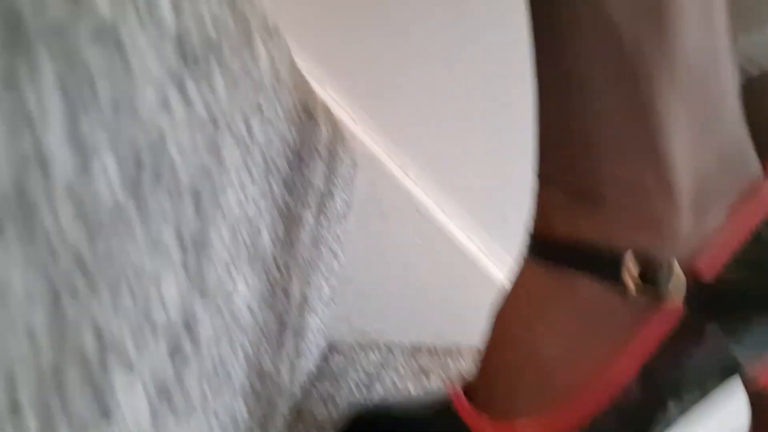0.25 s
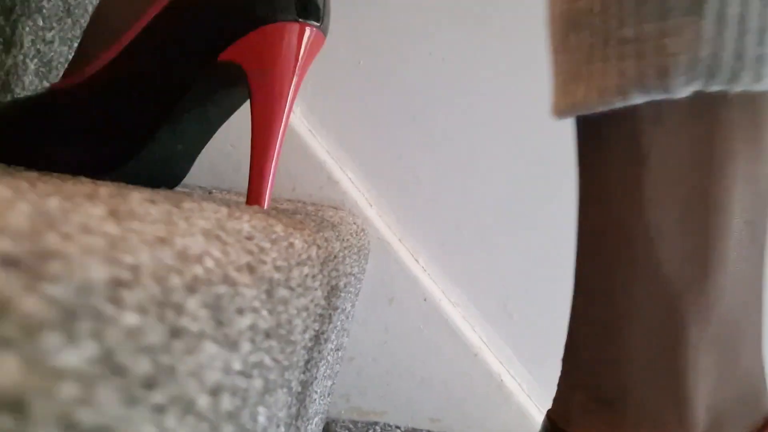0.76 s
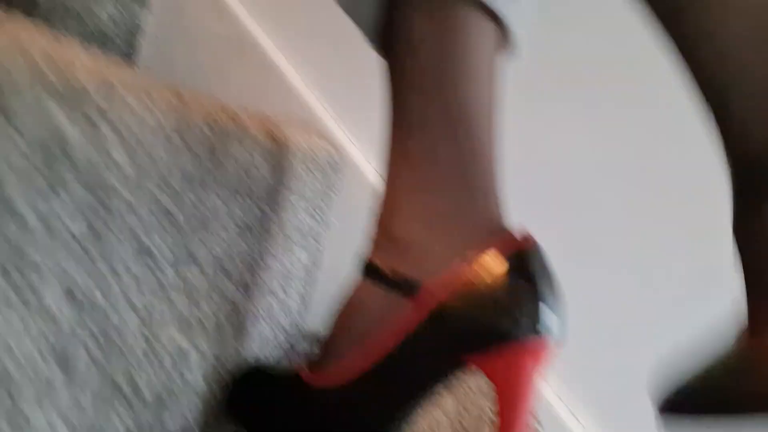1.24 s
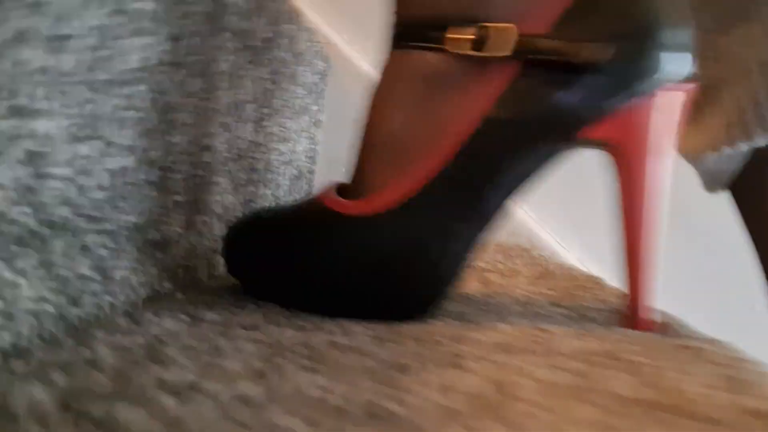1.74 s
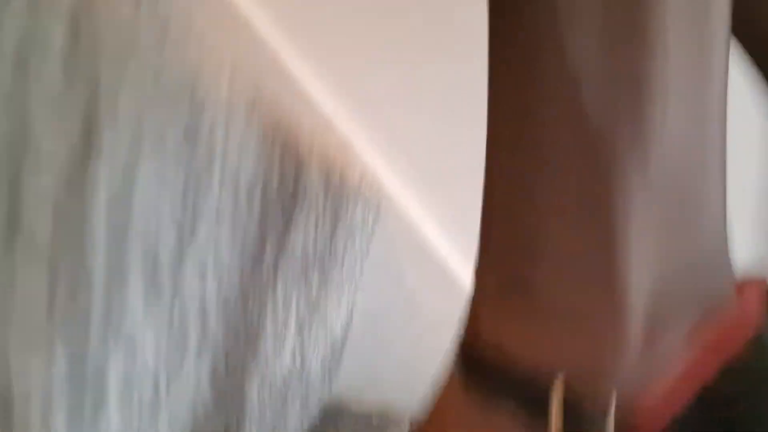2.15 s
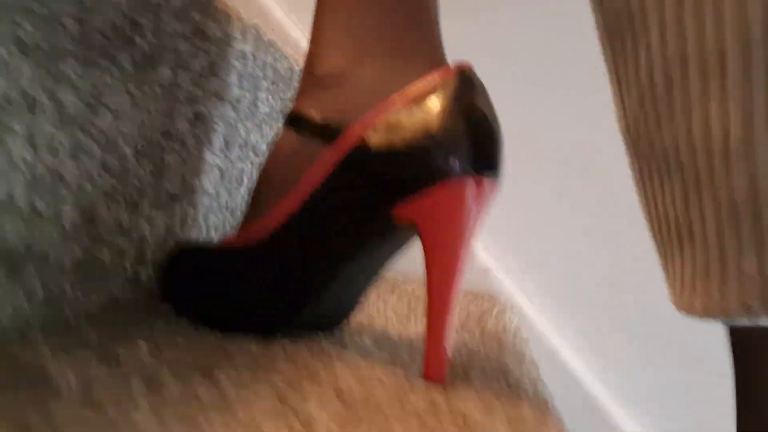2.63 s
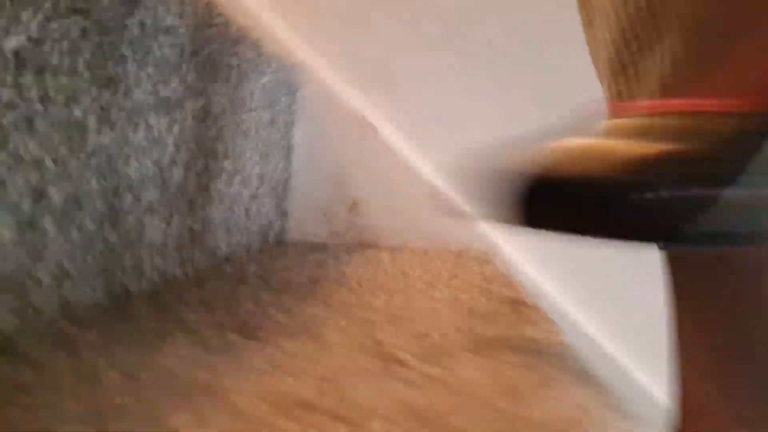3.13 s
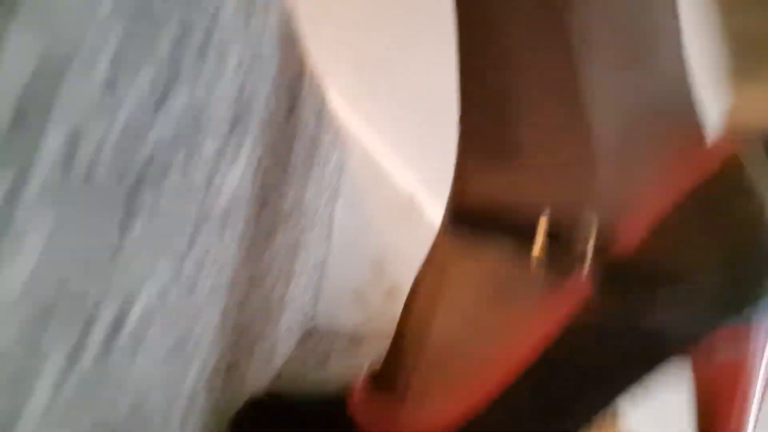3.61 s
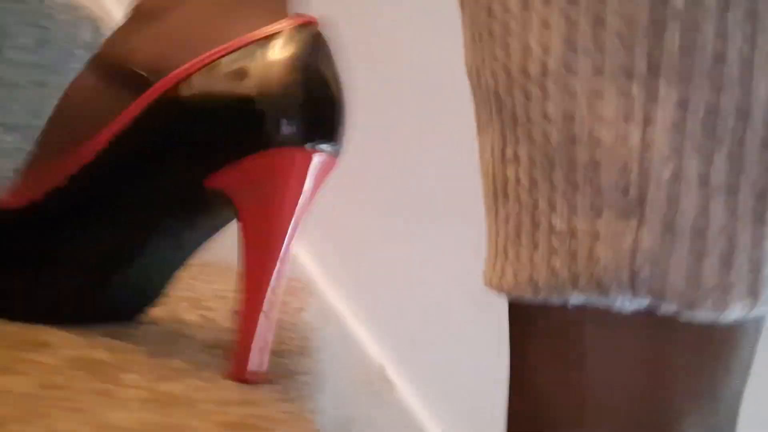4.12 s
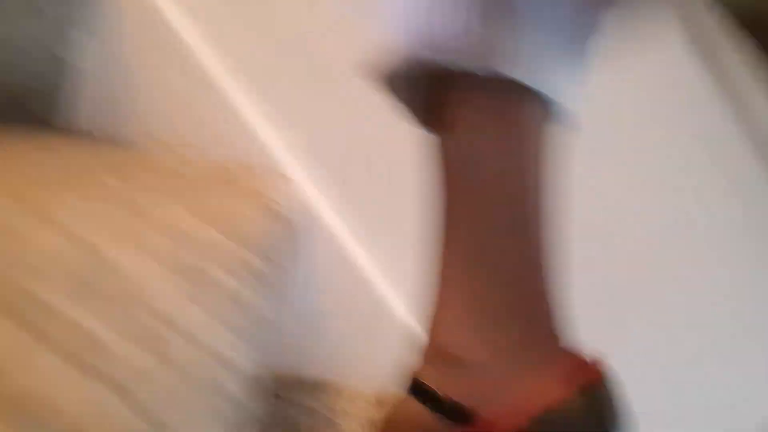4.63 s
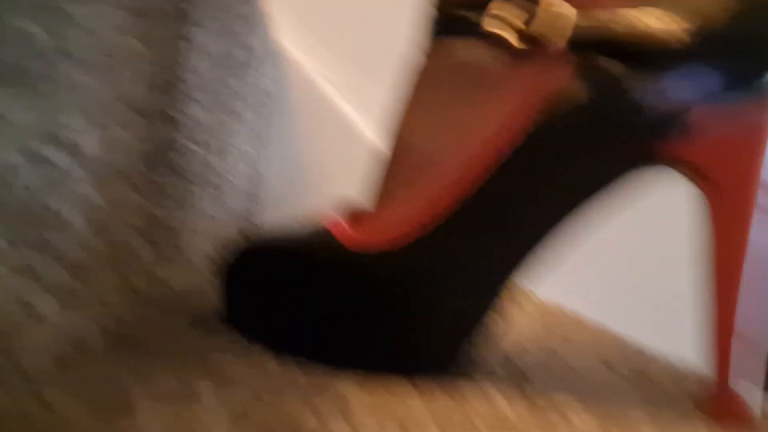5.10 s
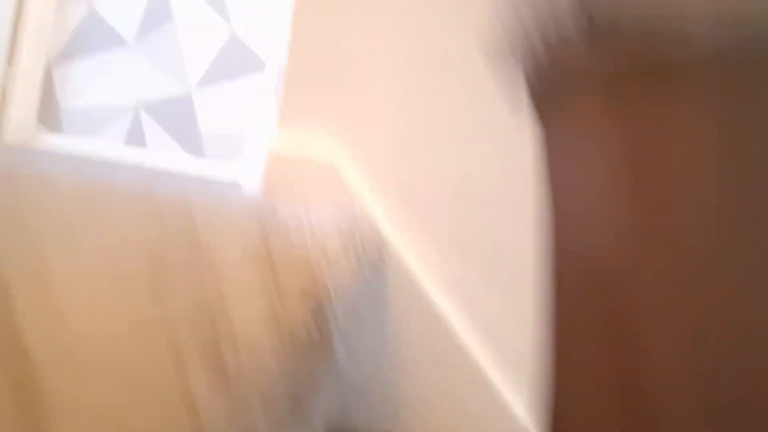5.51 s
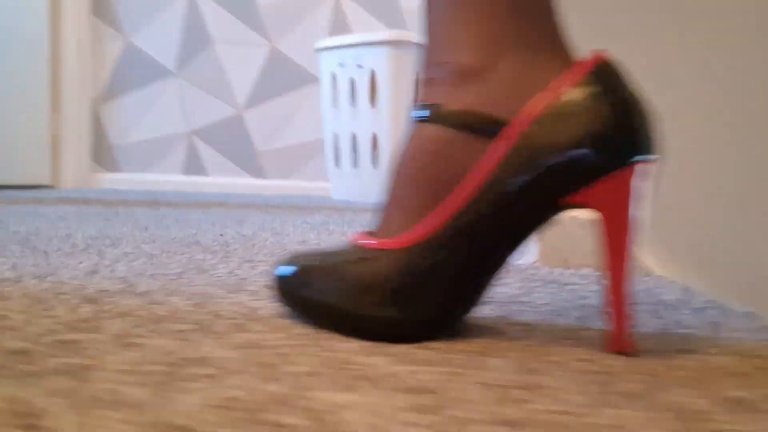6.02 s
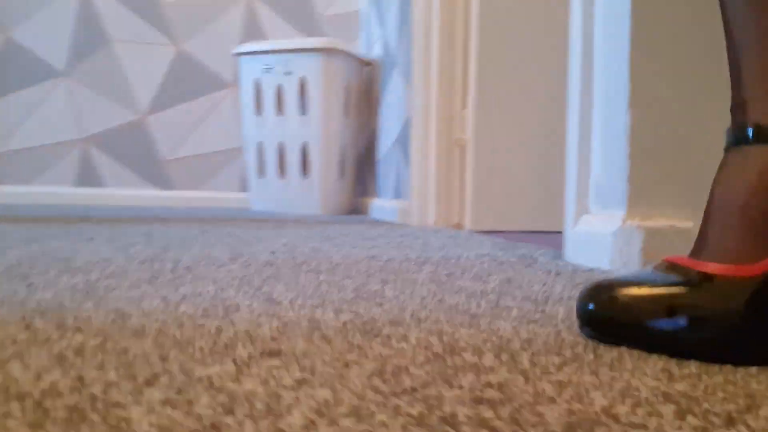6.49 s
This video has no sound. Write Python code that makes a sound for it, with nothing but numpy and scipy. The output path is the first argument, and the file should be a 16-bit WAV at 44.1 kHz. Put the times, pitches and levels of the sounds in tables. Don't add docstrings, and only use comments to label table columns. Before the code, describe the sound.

A person in high heels walks up carpeted wooden stairs, heard very close on a handheld phone in a small, quiet stairwell. A heavy, padded low thud opens at 0 s with a short wooden boom. Another firm thud lands near 0.85 s, then softer steps around 1.7 and 2.6 s; a hard, knocking heel strike sounds at 1.9 s and a duller one at 2.75 s. A strong deep step at 3.45 s brings low heel knocks, followed at 3.6 s by a tiny bright buckle snap. Firm thuds follow at 4.2 s and, loudest of the later ones, 5.1 s, with a dull heel thump at 5.2 s. A soft step with a small gritty scuff comes at 5.95 s, then almost only faint rustle and room air until 7 s. Throughout, pile scuffs, trouser cloth brushes, fibres tick, leather squeaks faintly, boards creak and the staircase rumbles quietly underneath.

```python
import sys
import numpy as np
from scipy import signal
from scipy.fft import rfft, irfft, next_fast_len
from scipy.io import wavfile

SR = 44100
rng = np.random.default_rng(int(sys.argv[2]) if len(sys.argv) > 2 else 0)


def volts(x):
    e = np.asarray(x, float) / 20
    return 10 ** e


def file_out(sig):
    cols = np.atleast_2d(sig).T
    lim = np.clip(cols, -1, 1)
    pcm = np.round(lim * 32767).astype(np.int16)
    wavfile.write(sys.argv[1], SR, pcm)


N = 297851
FOOT_PAN_DB = 3.6


def rms_one(x):
    return x / np.sqrt(np.mean(x ** 2) + 1e-20)


def peak_one(x):
    return x / np.max(np.abs(x))


def decay(t, t60_s):
    return volts(-60 * t / t60_s)


def onset(t, rise_s):
    return 1 - np.exp(-t / rise_s)


def butter(x, order, hz, kind):
    return signal.sosfilt(signal.butter(order, hz, kind, fs=SR, output="sos"), x)


def ring(hz, t60_s, t, phase=0):
    return np.sin(2 * np.pi * hz * t + phase) * decay(t, t60_s)


def resonance(x, hz, width_hz):
    r = np.exp(-np.pi * width_hz / SR)
    zeros = np.array([1, 0, -1]) * (1 - r * r) / 2
    poles = [1, -2 * r * np.cos(2 * np.pi * hz / SR), r * r]
    return signal.lfilter(zeros, poles, x)


def add(out, s, sound, pan_db=0):
    i = round(s * SR)
    sound = np.atleast_2d(sound)[:, :N - i]
    out[:, i:i + sound.shape[1]] += sound * volts(np.array([[pan_db / 2], [-pan_db / 2]]))


# start in seconds, peak in dB, tread pitch in Hz, deep joist in dB,
# stairwell boom in dB.
THUDS = [(0.004, -7, 102.5, -10, -24), (0.16, -27, 97.6, 0.5, -22), (0.846, -31, 77.5, 14.5, -2),
         (0.853, -15, 100.2, -0.5, -17), (1.009, -31.5, 66.9, 3.5, -7.5), (1.321, -45, 70, 9, 4),
         (1.658, -31, 70.3, -27, -4.5), (1.757, -32, 113.8, 7, 2), (1.942, -24, 118, -10, -13),
         (2.63, -42, 112.4, 15, 15), (3.44, -16, 44.2, -3, -9.5), (3.793, -35, 73.3, -14, -3.5),
         (4.189, -20, 100.7, -15, -9), (4.242, -17, 110.2, -1, -11), (4.545, -37.5, 82.8, -5, -23),
         (4.651, -29, 118, -2, -26), (4.726, -29.5, 82.4, 4, -9), (5.092, -18, 129.6, -3, -4.5),
         (5.106, -11.5, 89, -3.5, -14), (5.232, -48, 120, 11, -17), (5.958, -27, 66.4, -5, -19.5)]


def thuds():
    joist_hz, boom_hz, boom_t60_s = 53.4, 118, 0.74
    impact_t60_s, tail_share = 0.17, 0.37
    out, t = np.zeros((2, N)), np.arange(SR // 2) / SR
    for (s, db, hz, joist_db, boom_db), luck in zip(THUDS, rng.random((len(THUDS), 4))):
        t60_s = 0.29 * np.exp(-0.0669 * (db + 17.5))
        tread = ring(hz, t60_s, t) + 0.41 * ring(1.4 * hz, 1.19 * t60_s, t, luck[0])
        joist = volts(joist_db) * ring(joist_hz * (0.851 + 0.603 * luck[1]), 0.94 * t60_s, t, luck[2])
        boom = volts(boom_db) * ring(boom_hz, boom_t60_s, t, luck[3])
        wood = (tread + joist) * (tail_share + decay(t, impact_t60_s))
        add(out, s, volts(db - 8.5) * onset(t, 0.0047) ** 2 * (wood + boom), pan_db=1.66)
    return out


def contact(t):
    swell = (t / .001) * np.exp(1 - t / .001)
    return rng.standard_normal(len(t)) * (swell + 0.14 * decay(t, 0.28))


def crack(force):
    return peak_one(butter(force, 2, [3600, 14500], "band"))


def first_instant(t):
    return np.exp(-t / 0.00038)


# frequency in Hz, level in dB, t60 in seconds.
BOARD = [(207.6, 6.5, 0.34), (240.5, 11.5, 0.2), (300, 12.5, 0.11), (360.7, 2.5, 0.46), (405.6, 7, 0.23),
         (451, -2.5, 0.35), (667, -9.5, 0.4), (833, 2, 0.13)]


def board(t, luck):
    modes = 0
    for k, (hz, db, t60_s) in enumerate(BOARD):
        mode = ring(hz * (1 + 0.0393 * luck[k + 2]), t60_s, t, 0.5 * luck[k + 1])
        modes = modes + volts(db + 5.1 * luck[k]) * mode
    return peak_one(modes * onset(t, 0.0035) * (0.17 + decay(t, 0.033)))


def rise(hz, t):
    return onset(t, .0004 + .3 / hz) ** 2


# start in seconds, peak in dB, crack in dB, board in dB,
# time until seated in seconds.
STRIKES = [
    (0.211, -39.5, -47, -7.5, 0.00053),
    (0.435, -39, -55, -11, 0.00027),
    (1.928, -22.5, -39, -7, 0.003),
    (2.7408, -35, -62, -4, 0.00027),
    (3.47, -27, -55, -14, 0.0018),
    (4.637, -39, -41, 4.5, 0.00049),
    (5.229, -21, -44, -12, 0.00063),
]
# frequency in Hz, width in Hz, level in dB.
STRIKE_RINGS = [
    [(728, 170, -2.5), (1850, 87, -6)],
    [(480, 36, -7), (1080, 80, 0.5), (1623, 90, -3), (2360, 140, -11)],
    [(1022, 41, -3.5), (1502, 210, -4), (512, 140, 5), (690, 150, -6), (2230, 300, -30), (3150, 240, -15),
     (3500, 250, -24), (5200, 590, -29.5), (7550, 460, -36.5)],
    [(385, 160, 2.5), (697, 290, 0), (950, 250, -0.5), (1500, 83, -8.5), (1720, 59, -7)],
    [(350, 210, 7), (897, 69, -5.5), (1810, 270, -20), (2450, 110, -17.5), (3200, 440, -16),
     (3490, 730, -22), (5850, 220, -31), (10000, 390, -67)],
    [(480, 33, 6.5), (960, 84, -16), (1540, 87, -15), (2700, 240, -40)],
    [(297, 240, 9.5), (538, 170, 4.5), (1100, 220, -12), (1710, 72, -19), (2313, 330, -13),
     (3280, 270, -16.5), (4180, 130, -16), (5900, 280, -39), (7460, 430, -44)],
]


def strikes():
    seat_split_hz = 700
    lead_s, lead_db = 0.012, -19.5
    wash_db = -30
    out, t = np.zeros((2, N)), np.arange(SR // 4) / SR
    lucks = rng.standard_normal((len(STRIKES), 12))
    for (s, db, crack_db, board_db, seat_s), rings, luck in zip(STRIKES, STRIKE_RINGS, lucks):
        force, grit = contact(t), rng.standard_normal(len(t))
        seated = np.maximum(t - seat_s, 0)
        crush = grit * (t / lead_s) ** 2 * (t < lead_s)
        clean, rough, crushed = 0, 0, 0
        for hz, width_hz, ring_db in rings:
            late = seated if hz < seat_split_hz else t
            damped = volts(ring_db - 23.0 * width_hz * seated) * width_hz
            clean = clean - damped * ring(hz, np.inf, late) * rise(hz, late)
            gain = volts(ring_db) * np.sqrt(width_hz)
            rough = rough + gain * resonance(force, hz, 0.5 * width_hz)
            crushed = crushed + gain * resonance(crush, hz, 2 * width_hz)
        rough = rough * decay(t, 0.054)
        layers = 1.16 * peak_one(clean) + .5 * peak_one(rough)
        layers = layers + volts(board_db) * board(seated, luck)
        layers = layers + volts(crack_db) * crack(force * first_instant(t))
        wash = rms_one(resonance(grit, 500, 820)) * onset(t, 0.012) * decay(t, 0.25)
        add(out, s - .0005, volts(db) * layers, FOOT_PAN_DB + 1.1 * luck[11])
        add(out, s, volts(db + wash_db) * wash, FOOT_PAN_DB)
        add(out, s - lead_s, volts(db + lead_db) * peak_one(crushed), FOOT_PAN_DB)
    return out


# start in seconds, peak in dB, ring in Hz, board in dB.
KNOCKS = [(0.077, -49.5, 753, -4.5), (1.039, -54, 1530, -6.5), (1.773, -53.5, 1080, 3.5),
          (1.872, -45, 1390, -3.5), (1.884, -44, 1500, -22), (1.947, -40.5, 1730, 1.5),
          (2.294, -57, 1300, -33), (2.7955, -48.5, 1100, -5), (2.861, -59, 830, -7),
          (3.11, -61.5, 690, -10.5), (3.435, -58, 815, 10.5), (3.487, -31.5, 636, -9.5),
          (3.557, -46.5, 860, -5), (5.247, -54, 686, 9), (5.964, -41, 814, -13.5), (6.152, -65, 646, 5),
          (6.692, -57.5, 2080, -18)]
# start in seconds, peak in dB, ring in Hz, board in dB, shell in dB.
CLACKS = [
    (2.646, -61, 624, 11.5, -16),
    (3.497, -42, 1004, -10, -19),
    (3.601, -46, 410, -6, -40),
    (4.382, -48, 928, -19, -17),
    (5.091, -60, 890, 7, -20),
    (5.116, -45.5, 920, 7, -15),
]
# frequency in Hz, width in Hz, level in dB.
SHELL = [(1985, 180, 18.5), (2100, 730, 14.5), (3150, 1600, 5), (3950, 1500, -23)]


def knocks():
    tap_shell_db, tap_shell_follows = -16.5, 0.78
    out, t = np.zeros((2, N)), np.arange(SR // 4) / SR
    taps = [(*row, tap_shell_db - (1 - tap_shell_follows) * (row[1] + 50)) for row in KNOCKS]
    hits = sorted(taps + CLACKS)
    for (s, db, hz, board_db, shell_db), luck in zip(hits, rng.standard_normal((len(hits), 12))):
        crack_db = shell_db - 18
        force = contact(t)
        tip = 0.8 * ring(hz, 10.7 / hz + 0.015, t) * onset(t, 0.0012)
        tip = tip + 0.26 * peak_one(resonance(force, 1.345 * hz, 0.13 * hz))
        shell = 0
        for k, (shell_hz, width_hz, mode_db) in enumerate(SHELL):
            gain = volts(mode_db + 6.0 * luck[k + 4]) * (-1) ** k
            shell = shell + gain * resonance(force, shell_hz, width_hz)
        layers = volts(1.5) * tip + volts(board_db + 6.5) * board(t, luck)
        layers = layers + volts(shell_db + 7.5) * peak_one(shell) + volts(crack_db - 9.0) * crack(force)
        add(out, s - .0008, volts(db) * layers, FOOT_PAN_DB + 13.6 * luck[11])
    return out


# start in seconds, peak in
# dB, centre in Hz, width in Hz, # length in seconds.
GRINDS = [(0.43, -54, 1380, 1100, 0.04), (1.722, -92, 1580, 1150, 0.022), (4.179, -57.5, 370, 300, 0.018),
          (2.703, -65, 1100, 890, 0.13), (3.419, -58.5, 820, 350, 0.038), (3.603, -55, 840, 500, 0.019),
          (3.86, -67.5, 1020, 875, 0.13), (4.233, -66, 820, 583, 0.068), (4.653, -62, 1460, 1750, 0.029),
          (5.931, -42.5, 915, 259, 0.017)]


def grinds():
    out, t = np.zeros((2, N)), np.arange(SR // 5) / SR
    grains_per_s = 3000
    for s, db, hz, width_hz, length_s in GRINDS:
        size = volts(5.4 * np.minimum(rng.exponential(1, len(t)), 4))
        grains = rng.standard_normal(len(t)) * size * (rng.random(len(t)) < grains_per_s / SR)
        for width in (width_hz, 2 * width_hz, 2 * width_hz):
            grains = resonance(grains, hz, width)
        drag = onset(t, .003) ** 2 * volts(-6.0 * t / length_s) / (1 + (t / length_s) ** 5)
        add(out, s - .002, volts(db) * rms_one(grains) * drag, FOOT_PAN_DB)
    return out


# start in seconds, peak in dB.
SNAP = [
    (3.6084, -19.5),
]
# frequency in Hz, level in dB, t60 in seconds, pan in dB.
BUCKLE = [(5680, 16, 0.01, -5), (10000, 3, 0.0039, 4), (13200, 8, 0.005, -3), (13500, 10.5, 0.018, 10),
          (15700, 20.5, 0.0032, -5)]


def buckle():
    out, t = np.zeros((2, N)), np.arange(SR // 10) / SR
    (s, db), = SNAP
    for lag_s, lag_db in [(.001, 0), (.0023, -5), (.005, -16)]:
        for hz, mode_db, t60_s, pan_db in BUCKLE:
            mode = ring(hz * rng.uniform(.98, 1.02), t60_s, t)
            add(out, s + lag_s, volts(db + lag_db + mode_db - 24) * mode, pan_db)
        snap = crack(contact(t) * first_instant(t))
        add(out, s + lag_s, volts(db + lag_db - 16.0) * snap, pan_db=14.0)
    return out


def drift(rate_hz):
    r = np.exp(-80 * np.pi * rate_hz / SR)
    slow = signal.lfilter([1], [1, -2 * r, r * r], rng.standard_normal(N // 40 + 2002))[2000:]
    return np.interp(np.arange(N) / 40, np.arange(len(slow)), rms_one(slow))


def at_hz(points, hz, **ends):
    point_hz, value = np.transpose(points)
    return np.interp(np.log(hz), np.log(point_hz), value, **ends)


# frequency in Hz, left-right likeness from -1 to 1.
LIKENESS = [(60, 0.87), (180, 1), (550, 0.26), (1650, -0.56), (4970, -1.2), (15000, -0.02)]


def banded_noise(spectrum, patchy_db, flicker_hz):
    out, together = 0, drift(flicker_hz / 3)
    low_hz, top_hz = spectrum[0][0], min(spectrum[-1][0], 17000)
    edges = np.geomspace(low_hz, top_hz, int(2.5 * np.log2(top_hz / low_hz)) + 2)
    white = rng.standard_normal((2, 2, N + 8000))
    for k, (low, high) in enumerate(zip(edges, edges[1:])):
        mid, side = butter(white[k % 2], 2, [low, high], "band")[:, 8000:]
        hz = np.sqrt(low * high)
        alike = np.clip(at_hz(LIKENESS, hz), 0, .995)
        flicker_db = patchy_db * (together + 2.2 * drift(flicker_hz))
        gain = volts(at_hz(spectrum, hz, left=-90, right=-90) + flicker_db)
        out = out + gain * (np.sqrt(1 + alike) * mid + np.sqrt(1 - alike) * side * [[1], [-1]])
    return rms_one(out)


# start in seconds, peak in dB, duller part in dB,
# t60 in seconds.
LANDINGS = [
    (0.8364, -58.5, 6, 0.19),
    (1.731, -56.5, 6.5, 0.16),
    (2.6255, -56, 4, 0.18),
    (3.417, -59, 2, 0.4),
    (4.249, -53, 1, 0.088),
    (5.0937, -46.5, 0, 0.067),
    (5.93, -51, -2, 0.16),
]
# start in seconds, peak in dB, duller part in dB, t60 in seconds.
BRUSHES = [(0.117, -56, -25, 0.3), (0.202, -60.5, 4.5, 0.19), (0.306, -52.5, -12, 0.27),
           (0.5064, -58.5, -3.5, 0.078), (0.661, -56, -31, 0.63), (1.004, -54, -7, 0.093),
           (1.036, -61.5, -2, 0.3), (1.2834, -61, 1, 0.19), (2.2016, -64.5, 3.5, 0.25),
           (2.298, -63, -2, 0.16), (3.0624, -72.5, 3.5, 0.52), (3.376, -56.5, -8, 0.1),
           (3.494, -53, 12, 0.025), (3.525, -51.5, -22, 0.26), (3.608, -52, 4.5, 0.14),
           (4.38, -60, 3, 0.17), (4.575, -57, 3, 0.052), (4.632, -63, 11, 0.33), (4.748, -53.5, -30, 0.086),
           (5.11, -62, 19.5, 0.15), (5.19, -55.5, 14, 0.0092), (6.159, -76, 13.5, 0.23)]
# frequency in Hz, level in dB per Hz.
PILE = [(2060, -21), (3500, -1), (3920, -16), (4290, 0), (4780, -2.5), (8690, -5), (10500, -11.5),
        (16000, -8.5)]
# frequency in Hz, level in dB per Hz.
SWISH = [(350, -49.5), (600, 7), (753, -8), (848, -2), (1250, -5), (2650, -10.5), (4500, -18.5),
         (5850, -25.5), (9900, -120)]


def scuffs():
    out, t = np.zeros((2, N)), np.arange(SR // 3) / SR
    grain = volts(0.56 * drift(200))
    bright = banded_noise(PILE, 0.63, 64) * grain
    dull = banded_noise(SWISH, 1.2, 19.0) * grain
    for table, pan_db, swell_s in [(LANDINGS, 2.5, 0.0061), (BRUSHES, -4, 0.0028)]:
        for s, db, dull_db, t60_s in table:
            i = round(s * SR)
            fibres = bright[:, i:i + len(t)] + volts(dull_db + 7.5) * dull[:, i:i + len(t)]
            add(out, s, volts(db - 8.0) * fibres * onset(t, swell_s) * decay(t, t60_s), pan_db)
    return out


# start in seconds, rms in dB, pitch in Hz, width in Hz, length in seconds.
SQUEAKS = [(0.19, -61.5, 480, 120, 0.042), (0.593, -73.5, 383, 90, 0.096), (0.821, -70.5, 480, 121, .05),
           (1.561, -79.5, 2970, 400, .09), (1.686, -57.5, 205, 60, 0.082), (2.62, -57.5, 300, 79.5, .08),
           (3.8, -57, 196, 40.3, .12), (4.041, -83, 3150, 170, .04), (4.043, -85, 5750, 88.3, .035),
           (4.152, -87, 5200, 200, .015), (4.168, -73.5, 3500, 260, 0.027), (4.859, -69.5, 277, 71, 0.15),
           (5.09, -64, 2330, 350, 0.013), (5.099, -65, 4180, 147, 0.013), (5.12, -73, 5200, 121, .022),
           (5.466, -66, 480, 194, 0.024), (5.931, -56.5, 690, 80, .03), (6.467, -68, 350, 60, 0.087)]


def squeaks():
    out, t = np.zeros((2, N)), np.arange(SR // 4) / SR
    for s, db, hz, width_hz, length_s in SQUEAKS:
        rub = rng.standard_normal(len(t))
        arch = np.sin(np.pi * np.clip(t / (1.57 * length_s), 0, 1)) ** 0.77
        tone = rms_one(resonance(resonance(rub, hz, width_hz), hz, width_hz))
        add(out, s - 0.18 * length_s, volts(db) * arch * tone, pan_db=5.5)
    return out


def tiny_contacts(table, width_share):
    out, t = np.zeros((2, N)), np.arange(SR // 40) / SR
    for s, db, hz, pan_db in table:
        add(out, s - .001, volts(db) * peak_one(resonance(contact(t), hz, width_share * hz)), pan_db)
    return out


# start in seconds, peak in dB, centre in Hz, pan in dB.
TICKS = [(0.053, -62, 2500, 0), (0.504, -64, 6800, -5), (0.595, -61, 7000, -9), (0.878, -64, 7000, 17),
         (1.038, -66, 1500, 0), (1.09, -64, 6000, -10), (1.367, -68, 7000, -8), (1.544, -66.5, 6000, -12),
         (1.865, -70, 7500, -8), (2.124, -66.5, 4800, -8), (2.299, -71, 12000, 5), (2.633, -62, 9000, 6),
         (2.702, -68, 1500, -5), (2.718, -66, 8500, -1), (2.727, -74, 8000, -5), (2.812, -69, 13000, 0),
         (2.824, -70, 13900, -8), (2.862, -80, 10900, 4), (2.958, -75, 8000, -7), (3.09, -71, 5300, 1.5),
         (3.119, -70, 10400, 2), (3.45, -61, 11000, 3), (3.456, -63, 10000, 0), (3.498, -65, 12000, -1),
         (3.504, -64, 11000, -1), (3.53, -51.5, 8440, -12), (3.536, -51, 8950, -6), (3.611, -39, 5500, -8),
         (3.628, -69, 13500, 0), (3.908, -67, 4300, 0), (4.263, -49, 1000, 2), (4.376, -70, 11500, 2),
         (4.381, -55.5, 4370, -6), (4.388, -69, 10000, 6), (4.405, -64, 6500, 0), (4.413, -65, 10600, 8),
         (4.425, -68, 11000, 3), (4.648, -64, 1980, 0), (4.657, -49, 1210, -2), (4.669, -60, 2500, 2),
         (5.093, -59, 5000, 8), (5.103, -57, 13000, 7), (5.113, -46.5, 12300, 12), (5.128, -57, 13000, 4),
         (5.116, -56, 2980, 4), (5.126, -46.5, 1850, 0), (5.191, -60, 3000, 18)]


def ticks():
    return tiny_contacts(TICKS, width_share=0.23)


# start in seconds, peak in dB, centre in Hz, pan in dB.
PRICKS = [(1.9385, -51, 7000, -3), (1.757, -61, 5500, 0), (1.777, -62, 3030, 0), (1.894, -63, 3600, 0),
          (2.058, -63, 2500, 0), (2.633, -62, 3500, 3), (2.797, -68, 6000, -5), (4.654, -48, 900, 2),
          (3.498, -60, 5000, 0), (4.389, -70, 6000, 0), (4.415, -65, 4800, -2), (2.862, -63, 4000, 0),
          (3.037, -75, 9000, -3), (3.062, -70.5, 8000, -3.5), (3.626, -40.5, 2400, -5),
          (3.752, -68, 5000, -1.5), (3.758, -68, 4870, -9), (3.762, -81, 9000, -2), (3.795, -81, 8900, -5),
          (3.8625, -67, 6000, -7), (3.884, -67, 6000, 0), (3.897, -68, 11000, 0)]


def pricks():
    return tiny_contacts(PRICKS, width_share=0.4)


def swells(s, db, hold_s, rise_s, t60_s, rest_db):
    t = np.arange(N) / SR - np.array(s)[:, None]
    after_hold = np.maximum(t - np.array(hold_s)[:, None], 0)
    shape = np.exp(np.minimum(t, 0) / rise_s) * decay(after_hold, t60_s)
    return np.sqrt(volts(2 * rest_db) + volts(2 * np.array(db)) @ shape ** 2)


# start in seconds, hiss in dB, hold in seconds, finest part in dB,
# duller part in dB.
SWINGS = [(0.0, -80, 0.1, -12, 9), (0.572, -73, 0.32, -8, 0), (1.003, -78.5, 0.26, -9, 0),
          (1.51, -77.5, 0.1, -8, 2), (2.495, -83, 0.087, 5.5, -23), (3.156, -80.5, 0.16, 6, -26),
          (3.485, -72.5, 0.14, -1, 8), (3.986, -73, 0.24, 2, -18), (4.385, -80.5, 0.41, -6, 5.5),
          (4.847, -73.5, 0.32, -19, -0.5), (5.212, -81.5, 0.24, -6, 9), (6.197, -85, 0.12, -12, 12.5)]
# frequency in Hz, level in dB per Hz.
HISS = [(2060, -55), (3500, 20.5), (3780, -0.5), (5390, 3), (6050, 5.5), (7510, -10), (8530, 6.5),
        (9680, 1.5), (15100, -5.5), (16000, -10)]


def cloth():
    weave = volts(0.24 * drift(43))
    hiss = banded_noise(HISS, 0.61, 35) * weave
    sheen = rms_one(butter(hiss, 4, 10500, "high"))
    swish = banded_noise(SWISH, 1.2, 25) * np.sqrt(weave)
    s, db, hold_s, fine_db, dull_db = np.transpose(SWINGS)
    out = 0
    for part, part_db, rest_db in [(hiss, 0, -85.5), (sheen, fine_db, -96.5), (swish, dull_db, -76.5)]:
        out = out + part * swells(s, db + part_db, hold_s, rise_s=0.05, t60_s=0.47, rest_db=rest_db)
    return out


# time in seconds, rumble in dB.
LOAD = [(0.0, -31.5), (0.06, -41), (0.28, -59.5), (0.77, -60.5), (1.05, -66.5), (1.37, -59), (1.67, -49),
        (2.12, -55), (2.399, -49.5), (3.03, -60), (3.551, -53.5), (3.7, -44.5), (3.95, -50), (4.34, -49.5),
        (4.55, -56), (5.1, -50.5), (5.96, -63), (6.75, -62)]
# start in seconds, level in dB, hold in seconds.
SETTLES = [
    (0.0, -65.5, 0.21),
    (0.913, -64.5, 0.11),
    (1.885, -56, 0.1),
    (2.662, -64, 0.067),
    (3.628, -63.5, 0.3),
    (4.236, -55, 0.031),
    (4.514, -58, 0.28),
    (5.184, -60, 0.11),
    (6.117, -69.5, 0.46),
]
# frequency in Hz, level in dB per Hz.
RUMBLE = [(12, -30.5), (20, 2), (39, -3.5), (59, 3), (86, -15), (108, 8), (124, -5.5), (190, -61),
          (250, -103.5)]
# frequency in Hz, level in dB per Hz.
CREEP = [(88, -83), (150, -15), (199, 2.5), (323, -4.5), (367, -7), (456, -31), (750, -26), (980, -17),
         (1650, -120)]


def carcass():
    load_db = np.interp(np.arange(N) / SR, *np.transpose(LOAD))
    creep = swells(*np.transpose(SETTLES), rise_s=0.087, t60_s=1.2, rest_db=-79)
    return volts(load_db) * banded_noise(RUMBLE, 2.64, 12.7) + creep * banded_noise(CREEP, 0.9, 35)


# frequency in Hz, level in dB per Hz.
ROOM_TONE = [(15, -17), (25, -4), (108, 7), (137, -4), (175, -18), (317, -9.5), (489, -31), (840, -30),
             (1330, -86), (2110, -21.5), (4140, -58), (5280, -13), (8590, -77), (9570, -52), (16000, -38)]


def room_tone():
    return volts(-67) * banded_noise(ROOM_TONE, 0.69, 41)


def stairwell(x):
    t60_s, wall_cut_hz = 0.17, 3500
    size = next_fast_len(N + SR)
    w = 2 * np.pi * np.arange(size // 2 + 1) / size
    wall = 1 / (1 + 1j * w * SR / (2 * np.pi * wall_cut_hz))
    out = np.zeros((2, size // 2 + 1), complex)
    for k, lag in enumerate(rng.uniform(.011, .045, 12) * SR):
        trip = decay(lag / SR, t60_s) * wall * np.exp(-1j * w * lag)
        out[k % 2] += (-1) ** (k // 2) * trip / (1 - trip)
    return irfft(out * rfft(x, size), size)[:, :N]


def scene():
    left_lag_s, well_db = .0001, -11.5
    heels = strikes()
    far = butter(heels, 1, 800, "low")
    rest = knocks() + grinds() + buckle()
    hard, fibres = heels + rest, scuffs()
    hard[0] = np.interp(np.arange(N) - left_lag_s * SR, np.arange(N), hard[0])
    echo = volts(well_db) * stairwell((far + rest + fibres).mean(axis=0))
    bed = carcass() + cloth() + room_tone()
    return thuds() + hard + fibres + echo + squeaks() + ticks() + pricks() + bed


# frequency in Hz, width in Hz, level in dB.
PORT = [(5400, 900, 2), (8500, 900, -10), (9800, 1500, 6.5)]


def band_limit(x):
    return signal.sosfilt(signal.butter(12, 17160, fs=SR, output="sos"), x)


def record(dry):
    for hz, width_hz, db in PORT:
        dry = dry + (volts(db) - 1) * resonance(dry, hz, width_hz)
    dry = butter(dry, 1, 18, "high")
    top_cut = signal.cheby2(12, 60, 1.04 * 15900, fs=SR, output="sos")
    return band_limit(signal.sosfilt(top_cut, dry))


dry = scene()
out = record(dry)
file_out(out)
```